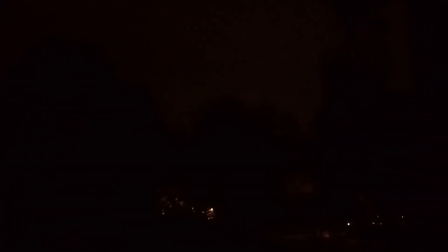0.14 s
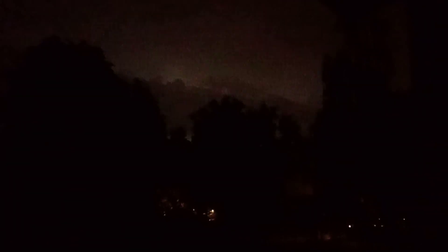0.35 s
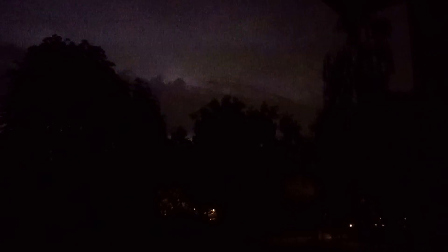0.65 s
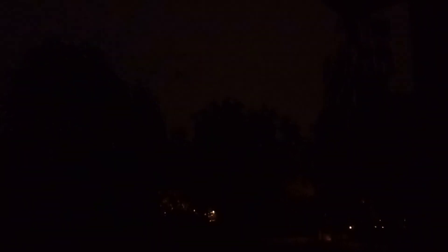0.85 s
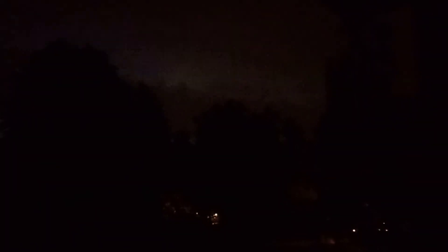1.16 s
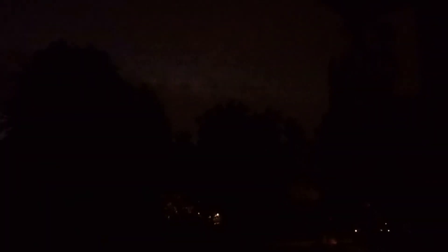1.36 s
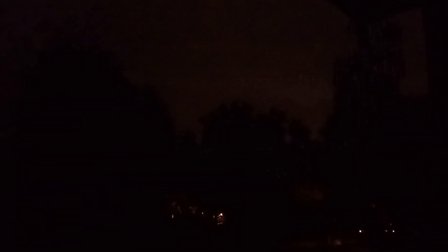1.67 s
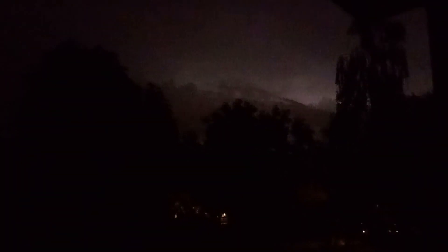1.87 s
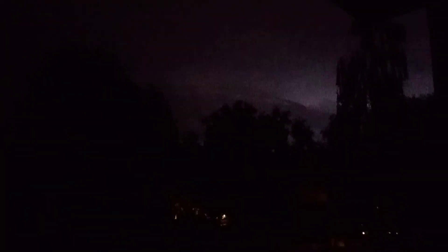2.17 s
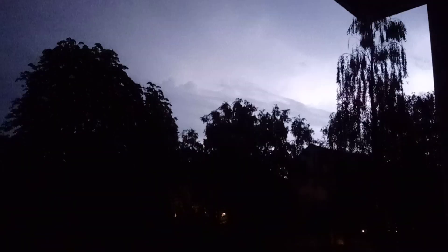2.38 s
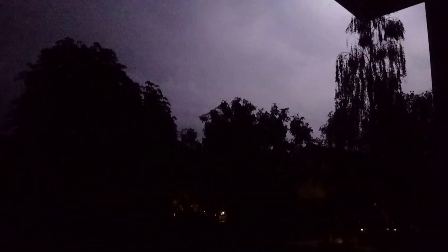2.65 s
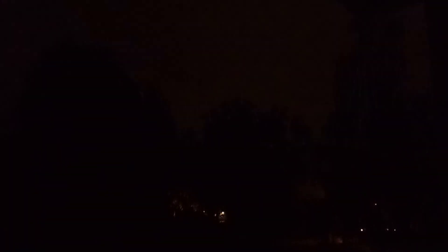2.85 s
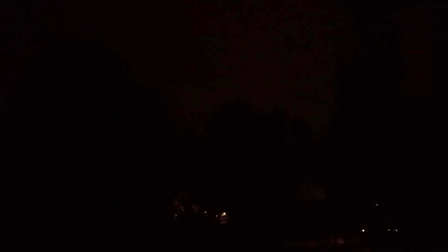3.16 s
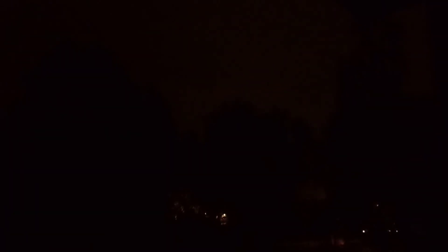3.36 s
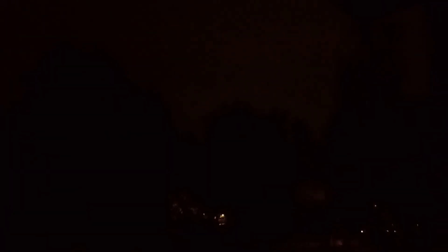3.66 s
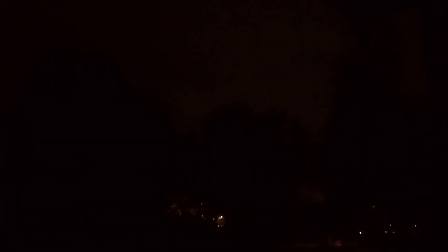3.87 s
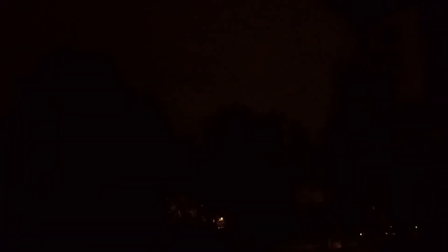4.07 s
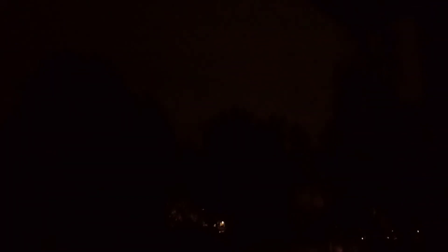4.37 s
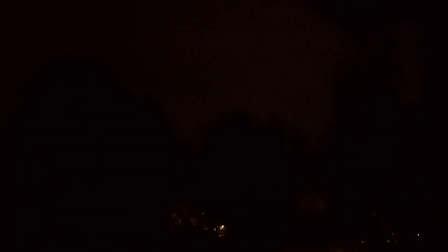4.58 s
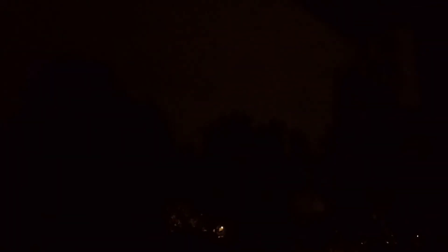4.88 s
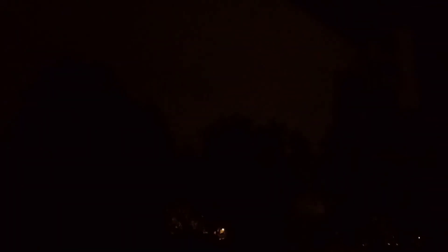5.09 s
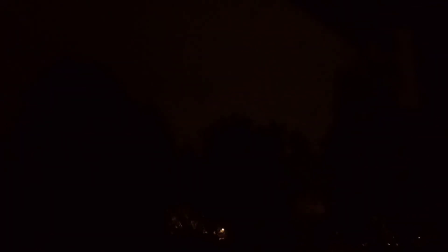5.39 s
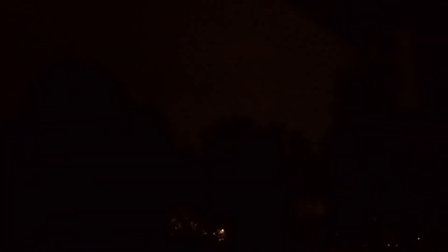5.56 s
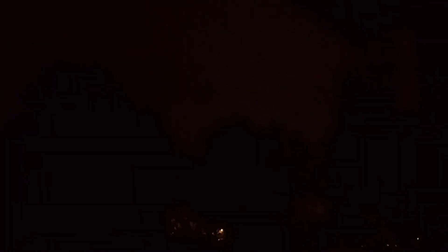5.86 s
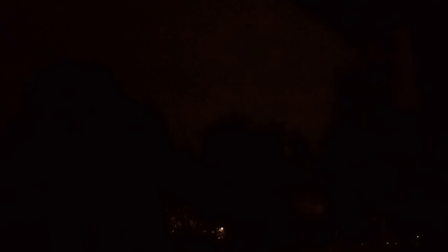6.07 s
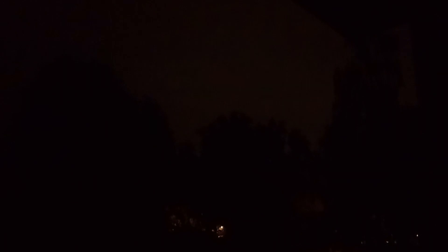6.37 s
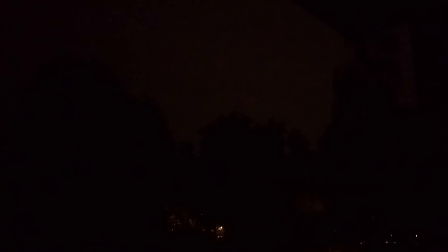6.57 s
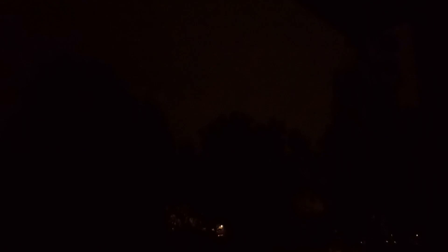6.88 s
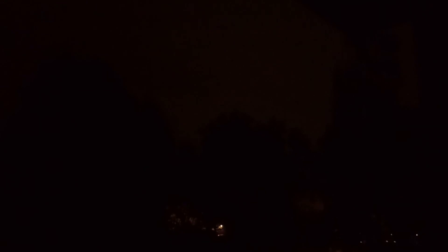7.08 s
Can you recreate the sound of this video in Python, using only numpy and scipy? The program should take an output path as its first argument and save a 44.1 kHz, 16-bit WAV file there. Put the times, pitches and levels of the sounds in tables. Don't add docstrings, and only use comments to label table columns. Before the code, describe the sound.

A low, dull thunder roll swells and sinks without any sharp crack, while fine rain patters over leaves and ground in the dark. Single drops tick and splash close by. One short hollow clatter, like a bumped object, happens early with a faint room tail. Handheld stereo pickup under shelter, treble stronger on the right side, slight background hiss.

```python
import sys
import numpy as np
from scipy import signal
from scipy.fft import rfft, irfft, next_fast_len
from scipy.io import wavfile
from scipy.ndimage import uniform_filter1d

SR = 44100
rng = np.random.default_rng(int(sys.argv[2]) if len(sys.argv) > 2 else 0)


def nominal_scale(level):
    x = np.asarray(level, float) / 20
    return 10 ** x


def master_out(mix):
    frames = np.transpose(np.atleast_2d(mix))
    ceiling = np.clip(frames, -1, 1)
    pcm = np.round(ceiling * 32767).astype(np.int16)
    wavfile.write(sys.argv[1], SR, pcm)


N = 318914
PADDED = next_fast_len(N, real=True)
HZ = np.fft.rfftfreq(PADDED, 1 / SR) + 1e-3

# (frequency [Hz], level [dB per Hz])
LEFT_PORT = [(700, -99.5), (1100, -91.5), (1600, -87.5), (2250, -83), (3000, -91), (3600, -85),
             (4300, -82.5), (5500, -88), (6400, -104.5), (7300, -113), (8000, -130), (16000, -140)]
RIGHT_PORT = [(700, -94), (1100, -91), (1600, -86), (2250, -83.5), (3000, -87.5), (4300, -81.5),
              (5500, -81), (6300, -79), (7300, -89.5), (8300, -109), (10200, -116), (13000, -126),
              (16000, -122)]
# (frequency [Hz], level [dB per Hz])
SELF_NOISE = [(4000, -122), (8300, -121), (10200, -119), (13300, -121.5), (13900, -125), (14400, -114),
              (15000, -110.5), (15500, -110.5)]


def rms_one(x):
    return x / np.sqrt(np.mean(x ** 2) + 1e-20)


def at_hz(points, hz):
    table_hz, value = np.transpose(points)
    return np.interp(np.log(hz), np.log(table_hz), value)


def band(x, low_hz, high_hz, order=2):
    edges_hz = [low_hz, min(high_hz, .45 * SR)]
    return signal.sosfilt(signal.butter(order, edges_hz, "band", fs=SR, output="sos"), x)


def coloured(x, gain):
    return irfft(rfft(x, PADDED) * gain, PADDED)[..., :N]


def swell(s, length_s):
    return np.exp(-((np.arange(0, N, 40) / SR - s) / length_s) ** 2)


def spread(slow):
    return np.interp(np.arange(N) / 40, np.arange(len(slow)), slow)


def drift(rate):
    r = np.exp(-80 * np.pi * rate / SR)
    white = rng.standard_normal(N // 40 + 2002)
    slow = signal.lfilter([1], [1, -2 * r, r * r], white)[2000:]
    return spread(rms_one(slow))


def steadied(x, span_s):
    span = int(span_s * SR)
    power = uniform_filter1d(uniform_filter1d((x ** 2).mean(axis=0), span), span)
    return rms_one(x / np.sqrt(power + 0.56 * power.mean()))


def impacts(per_s, spread_db):
    sizes = nominal_scale(spread_db * np.minimum(rng.exponential(1, (2, N)), 4))
    sizes = sizes * rng.choice([-1, 1], (2, N))
    return rms_one(sizes * (rng.random((2, N)) < per_s / SR))


def diffuse(pair, left, right):
    # (frequency [Hz], left-right likeness [-1..1])
    likeness = [(40, 1), (160, 0.99), (300, 0.9), (480, 0.73), (750, 0.49), (1050, 0.35), (1300, -0.054),
                (1650, -0.27), (1900, -.25), (2250, 0.4), (2600, 0.0071), (16000, -0.17)]
    alike = np.clip(at_hz(likeness, HZ), -1, 1)
    mid, side = rfft(pair, PADDED)
    mid = np.sqrt(1 + alike) * mid
    side = np.sqrt(1 - alike) * side
    both = np.array([(mid + side) * left, (mid - side) * right])
    return both * np.sqrt(PADDED / np.mean(abs(both) ** 2))


def port_gains(hz):
    return np.array([nominal_scale(at_hz(port, hz) + 88) for port in (LEFT_PORT, RIGHT_PORT)])


def ports():
    return port_gains(HZ) / (1 + (450 / HZ) ** 4)


def even(edges_hz):
    click = np.zeros(4096)
    click[0] = 1
    summed = sum(band(click, low, high, order=1) for low, high in zip(edges_hz, edges_hz[1:]))
    total = abs(rfft(summed))
    return 1 / (np.interp(HZ, np.linspace(0, SR / 2, len(total)), total) + .05)


def self_noise():
    # (frequency [Hz], level [dB])
    capsule_lean = [(7000, -11), (9000, -14), (11000, -4.5), (15000, -4.5)]
    white = rng.standard_normal((2, N)) * np.sqrt(SR / 2)
    lean_db = np.outer([.5, -.5], at_hz(capsule_lean, HZ))
    return coloured(white, nominal_scale(at_hz(SELF_NOISE, HZ) + lean_db))


def thunder():
    # (frequency [Hz], level [dB per Hz])
    roll_colour = [(8.8, -34), (15, -17.5), (38, -14.5), (88, -4), (154, -2), (229, -9), (262, -10.5),
                   (446, -24.5), (529, -28.5), (708, -36), (900, -33.5), (1170, -73), (1980, -120)]
    # (time [s], level [dB], lean to the bass [dB per octave])
    storm = [(0.0, -45.5, -19), (0.43, -41, -0.5), (0.85, -46.5, -0.5), (1.28, -41, -3), (1.7, -42, 5),
             (2.13, -39, -4), (2.55, -40.5, -10), (2.98, -39, 4.5), (3.4, -40.5, -1.5), (3.83, -41, -2),
             (4.25, -44.5, -11), (4.68, -45, -11), (5.1, -45.5, -3.5), (5.53, -44.5, -12.5),
             (5.95, -46, -10), (6.38, -43, -1), (6.8, -42.5, -4.5), (7.23, -41.5, -5)]
    # (time [s], swell [dB], pitch
    # [Hz], length [s])
    peals = [(0.02, 17, 127, 0.079), (0.34, 13, 127, 0.058), (0.728, 9, 97.5, 0.2), (0.87, 14.5, 164, 0.07),
             (1.25, 7, 200, 0.84), (1.275, 7.5, 182, 0.2), (1.407, 20.5, 107.5, 0.37),
             (1.41, -10, 113, 0.29), (1.745, 17.5, 102, 0.15), (1.75, 14, 360, 0.089),
             (2.434, 11.5, 150, 0.061), (2.503, 8, 150, 0.2), (3.165, 6.5, 160, 0.11),
             (3.25, 7.5, 167, 0.66), (3.385, 13.5, 101, 0.07), (3.557, 12, 64, 0.051),
             (3.725, 11, 99, 0.057), (4.197, 14, 144, 0.27), (4.585, 12, 99, 0.038),
             (4.678, 13.5, 101, 0.27), (4.923, 14, 138, 0.11), (5.323, 10.5, 140, 0.25),
             (5.69, 20.5, 138, 0.095), (5.96, 12.5, 184, 0.11), (6.53, 13, 69, 0.14), (6.585, 9, 172, 0.26),
             (6.66, 7, 194, 0.28), (6.95, 15, 136, 0.29), (7.095, 10, 71, 0.088), (7.206, 19, 143, 0.042),
             (.3, -4, 150, 0.27), (.55, 8.5, 154, 0.16), (1.05, 0.5, 205, 0.23), (1.6, 1, 500, .2),
             (2.3, -10, 203, 0.5), (2.62, 13.5, 150, 0.085), (2.75, -5, 200, 0.35), (3.0, 9, 430, 0.14),
             (4.33, 24, 60, .1), (5.0, -9.5, 205, 0.28), (5.4, 6, 392, 0.096), (5.85, 6.5, 370, 0.13),
             (6.1, 9.5, 383, 0.16), (6.5, -11, 480, .3), (6.7, -5, 150, .3), (6.95, -1, 150, .2),
             (3.95, 10, 280, .3), (2.45, 4, 287, 0.17), (3.3, 3.5, 300, 0.34), (6.8, 3, 288, 0.35)]
    # (time [s], swell [dB], pitch [Hz], length [s])
    growls = [(.1, 1, 330, 0.11), (.9, 6, 400, 0.34), (1.3, 5, 483, 0.26), (1.6, 7, 433, 0.3),
              (2.2, 3.5, 400, 0.083), (2.42, 1.5, 373, 0.11), (2.7, -5.5, 420, 0.15), (3.1, 3.5, 418, 0.19),
              (3.68, 9.5, 397, 0.057), (3.88, -7, 350, 0.29), (4.3, 2, 377, 0.17), (5.5, -10, 328, 0.36),
              (5.85, 0, 352, 0.078), (6.5, 8, 372, 0.25), (6.8, 7, 360, 0.36), (7.1, 6.5, 420, 0.097),
              (2.25, -3, 500, 0.25), (3.88, 7, 700, 0.088), (2.37, 8.5, 276, 0.04), (2.62, -10, 298, 0.065),
              (6.25, 2, 424, 0.15), (3.4, 6.5, 327, 0.035), (6.1, -0.5, 354, .08)]
    peal_width_oct, growl_width_oct, length_scale = 0.23, 1, 0.5
    pivot_hz, depth_share, trim_db = 113, 0.42, -1.5
    left_lag_s, right_lean_db = .00012, 2.5

    colour = nominal_scale(at_hz(roll_colour, HZ)) / np.sqrt(1 + (HZ / 900) ** 6)
    left = colour * nominal_scale(-right_lean_db / 2) * np.exp(-2j * np.pi * HZ * left_lag_s)
    right = colour * nominal_scale(right_lean_db / 2)
    roll = diffuse(impacts(4000, 2.03), left, right)
    whole = np.std(irfft(roll, PADDED))

    time_s, *curves = np.transpose(storm)
    level_db, depth = [np.interp(np.arange(N) / SR, time_s, curve) for curve in curves]
    humps = [(db * swell(s, length_scale * length_s), pitch_hz, width_oct)
             for rows, width_oct in ((peals, peal_width_oct), (growls, growl_width_oct))
             for s, db, pitch_hz, length_s in rows]

    edges_hz = 45 * 2 ** np.arange(0, 4, 1 / 3)
    centres_hz = np.append(edges_hz, edges_hz[-1] * 1.26) / 1.12
    below = [0] + [1 / (1 + (HZ / edge) ** 12) for edge in edges_hz] + [1]
    out = 0
    for low, high, hz in zip(below, below[1:], centres_hz):
        layer = irfft(roll * (high - low), PADDED)[:, :N]
        swell_db = sum(hump * np.exp(-(np.log2(hz / pitch_hz) / width_oct) ** 2)
                       for hump, pitch_hz, width_oct in humps)
        lean_db = depth_share * (depth - depth.mean()) * np.clip(np.log2(pivot_hz / hz), -1, 1)
        gain = nominal_scale(level_db + trim_db + lean_db + spread(swell_db))
        out = out + gain * layer.std() / whole * steadied(layer, span_s=0.31)
    return out


def knocks():
    # (time [s], peak [dB], mode tilt [dB per octave])
    blows = np.array([(1.625, -27, -30), (1.634, -26, -29), (1.652, -36, -17), (1.666, -40, -10),
                      (1.682, -39, -14), (1.696, -50, 7), (1.7085, -33.5, 1), (1.7135, -27, 2),
                      (1.7175, -32.5, 1.5), (1.7225, -38, 0), (1.729, -40, 2), (1.7345, -29, -2.5),
                      (1.746, -42, -3), (1.755, -39, -8), (1.765, -34, -19), (1.777, -42, -13),
                      (1.787, -42, -8), (1.797, -48, -2), (1.808, -45, -4), (1.82, -46, 4), (1.84, -55, -9),
                      (1.86, -60, 1), (1.88, -60, 8), (1.902, -53, -15), (1.955, -57, 4.5)])
    # (frequency [Hz], level [dB], t60 [s])
    modes = [(374, -25, 0.041), (480, -8, 0.03), (547, -10, 0.05), (639, -4, 0.066), (714, -2, 0.071),
             (851, -13, 0.037), (1056, -11.5, 0.023), (1150, -17, 0.03), (1220, -20, 0.026),
             (1373, -11, 0.021), (2003, -11.5, 0.027), (2330, -11, 0.016), (2730, -22, 0.0086),
             (4270, -20, 0.012)]
    out = np.zeros((2, N))
    time_s, peak_db, tilt_db = blows.T
    start = (time_s * SR).astype(int)
    for k, (hz, db, t60_s) in enumerate(modes):
        strength_db = peak_db + db - 7 + tilt_db * np.log2(hz / 460)
        strength_db = strength_db + rng.normal(0, 2.6, (len(start), 2)).T
        late = (rng.random(len(start)) * .007 * SR * (abs(hz - 675) > 80)).astype(int)
        clicks = np.full((2, N), 1e-18)
        clicks[:, start + late] = nominal_scale(strength_db) * (-1) ** k
        r, w = nominal_scale(-60 / (t60_s * SR)), 2 * np.pi * hz / SR
        out += signal.lfilter([0, np.sin(w)], [1, -2 * r * np.cos(w), r * r], clicks)

    t = np.arange(SR // 2) / SR
    shared, *own = rng.standard_normal((3, len(t)))
    tail = band(shared + 0.85 * np.array(own), 150, 2600, order=1)
    tail = tail * nominal_scale(-60 * t / 0.86) * np.minimum(t / 0.0071, 1)
    hollow = np.exp(-((HZ - 680) / 180) ** 2)
    room = signal.fftconvolve(coloured(out, 1 - .75 * hollow), tail, axes=1)[:, :N]
    return (out + nominal_scale(-33.5) * room) * nominal_scale([[-1.5], [.6]])


def snaps():
    # (time [s], peak [dB])
    bursts = [(0.855, -64), (1.6656, -54), (2.1071, -62), (2.5735, -68), (4.2901, -68), (5.1921, -54),
              (5.903, -61), (6.2158, -63), (6.5051, -70), (6.6039, -66), (6.999, -64), (7.0529, -75)]
    t60_s, trim_db, rise_s = .035, -1, .0015
    out, t = np.zeros((2, N + 2000)), np.arange(2000) / SR
    for s, db in bursts:
        envelope = nominal_scale(db + trim_db - 60 * t / t60_s) * np.minimum(t / rise_s, 1)
        start = round(s * SR)
        out[:, start:start + 2000] += envelope * rng.standard_normal((2, 2000))
    resonance = nominal_scale(at_hz(SELF_NOISE, HZ) + 121) / (1 + (7500 / HZ) ** 12)
    return coloured(out[:, :N], resonance * nominal_scale([[-14], [2.5]]))


def faint_drips(count):
    when, size, pitch, spray = rng.random((count, 4)).T
    peak_db = -47 + 3 * (2 * size - 1)
    spray_db = -77 + 8 * (spray - .5)
    return np.transpose([when * N / SR, peak_db, 3600 * 1.85 ** pitch, spray_db])


def drips():
    # (time [s], peak [dB], splash centre [Hz], spray above 8 kHz [dB])
    near_drops = [(0.2654, -36.5, 5850, -72), (0.3381, -43, 3550, -69), (0.83, -43, 3780, -69),
                  (0.9198, -37, 6360, -85), (1.0874, -40, 4480, -66), (1.3019, -36, 5890, -71),
                  (1.6654, -59, 4240, -74), (1.7944, -35, 6190, -76), (2.0184, -39, 6340, -70),
                  (2.1046, -46, 4570, -73), (2.151, -36, 4380, -67), (2.7294, -36.5, 4270, -69),
                  (3.1697, -31.5, 4900, -72), (3.4795, -45, 4640, -76), (3.6112, -36, 5140, -77),
                  (3.6421, -35, 5080, -71), (3.7484, -41, 3630, -82), (4.5496, -36, 4500, -70),
                  (4.6543, -35, 6540, -79), (4.7694, -46, 6100, -70), (4.9995, -35, 5500, -67),
                  (5.1652, -36.5, 6400, -72), (5.1896, -33, 4970, -60.5), (5.4064, -37, 4340, -73),
                  (5.8994, -45, 4110, -79), (6.2173, -41, 4030, -69), (6.5809, -30.5, 5050, -75),
                  (6.6059, -29, 5650, -77), (6.6648, -51, 5130, -82), (6.6794, -37, 4900, -80),
                  (0.4539, -40, 6130, -80), (1.2565, -44, 5420, -85), (1.5648, -41, 4530, -70),
                  (1.7095, -43, 4300, -70), (2.3042, -40, 4510, -72), (3.1815, -41, 5500, -78),
                  (3.1935, -41, 5300, -78), (3.5867, -39, 4470, -80), (3.7155, -41, 6190, -80),
                  (5.195, -43, 6600, -81), (6.6115, -35, 5600, -77), (7.0663, -41, 4160, -72),
                  (0.861, -46, 6200, -72), (5.032, -44, 5800, -71), (6.5266, -39, 6300, -76),
                  (3.2005, -40, 6200, -74), (2.7018, -50, 6000, -69), (2.9667, -38, 6500, -77),
                  (3.8496, -43, 6400, -75), (4.2453, -47, 6400, -70)]
    splash_t60_s, tick_t60_s, spray_rise_s, droplets_per_s = 0.12, .011, 0.0053, 1600
    out, t = np.zeros((2, N + 4000)), np.arange(4000) / SR
    tick = nominal_scale(6 - 60 * t / tick_t60_s)
    fall = nominal_scale(-3.5 - 60 * t / splash_t60_s)
    spray_rise = np.minimum(t / spray_rise_s, 1)
    for s, db, hz, spray_db in [*near_drops, *faint_drips(count=30)]:
        noise = rng.standard_normal((2, 4000)) * np.minimum(t / .0005, 1)
        burst = noise * (.3 * tick + fall)
        crisp = band(noise * tick, max(hz / 1.03, 4100), hz * 1.55)
        crisp = crisp / abs(crisp).max(axis=1, keepdims=True)
        droplets = (rng.random(4000) < droplets_per_s / SR) * np.sqrt(SR / droplets_per_s)
        beads = band(noise * droplets * fall, hz / 1.1, hz * 1.13)
        splash = nominal_scale(db - 4.5) / port_gains(hz).mean() * (beads + nominal_scale(4) * crisp)
        spray = nominal_scale(spray_db + 5) / port_gains(9120).mean() * band(burst * spray_rise, 7700, 10300)
        spray = spray * nominal_scale([[-12], [3.5]])
        body = nominal_scale(db - 3) / port_gains(2150).mean() * band(burst, 2200, 2700)
        start = round(s * SR)
        out[:, start:start + 4000] += splash + spray + body
    return coloured(out[:, :N], ports())


def rain():
    # (time [s], swell [dB], length [s])
    flurries = [(0.122, 3, 0.042), (0.263, 2, 0.061), (0.35, 0, 0.03), (0.85, 4, 0.05), (1.163, 2, 0.056),
                (1.294, 1.5, 0.08), (1.784, 2, 0.26), (2.01, 2, 0.15), (2.147, 1.5, 0.076),
                (2.363, 3, 0.088), (2.5, 1, 0.14), (2.762, 1.5, 0.07), (2.85, 2, 0.05), (3.17, 2, 0.06),
                (3.327, 1, 0.3), (3.49, 3.5, 0.033), (3.636, 3, 0.07), (3.764, 2.5, 0.084),
                (4.27, 2.5, 0.07), (4.4, 3, 0.089), (4.563, 3.5, 0.038), (4.673, 0, 0.017),
                (4.786, 1, 0.045), (4.957, 0, 0.04), (5.04, 2.5, 0.05), (5.217, 1.5, 0.15),
                (5.485, 2, 0.32), (6.067, 2, 0.21), (6.233, 2, 0.03), (6.64, 2.5, 0.23)]
    hiss_db, patter_db = -49.5, -55
    flurry_db = spread(sum(db * swell(s, 0.49 * length_s) for s, db, length_s in flurries))

    far = rng.standard_normal((2, N))
    edges_hz = 350 * 2 ** np.arange(0, 6.1, .5)
    hiss = sum(band(far, low, high, order=1) * nominal_scale(2.06 * drift(15.6))
               for low, high in zip(edges_hz, edges_hz[1:]))
    hiss = rms_one(coloured(hiss, even(edges_hz)))

    patter = impacts(1200, 4.5) * nominal_scale(3.5 * drift(18))
    patter = rms_one(signal.lfilter([1, -1.6, .64], [1], patter))

    mix = diffuse(hiss + nominal_scale(-3.5) * patter, *ports())
    dull = 1 / (1 + (HZ / 3300) ** 6)
    low, high = irfft([mix * dull, mix * (1 - dull)], PADDED)[..., :N]
    return nominal_scale(hiss_db + flurry_db) * low + nominal_scale(patter_db + flurry_db) * high


def scene():
    return thunder() + knocks() + snaps() + drips() + rain()


def top_cut(x):
    return signal.sosfilt(signal.butter(12, 16870, fs=SR, output="sos"), x)


def record(dry):
    cutoff_hz = 15520
    mix = coloured(dry + self_noise(), HZ < cutoff_hz)
    return top_cut(mix)


dry = scene()
out = record(dry)
master_out(out)
```